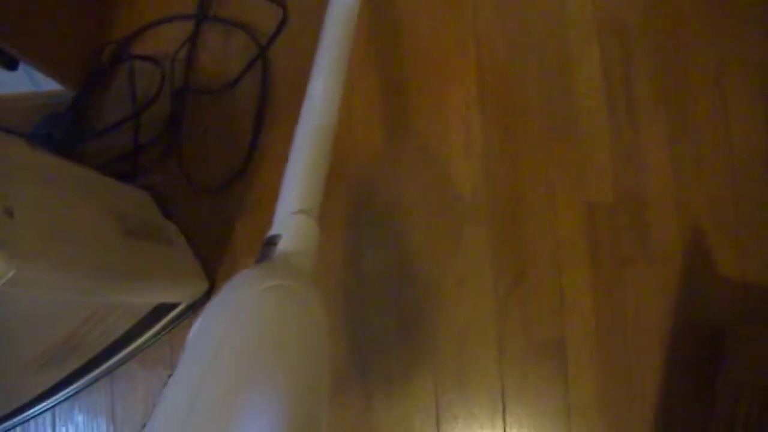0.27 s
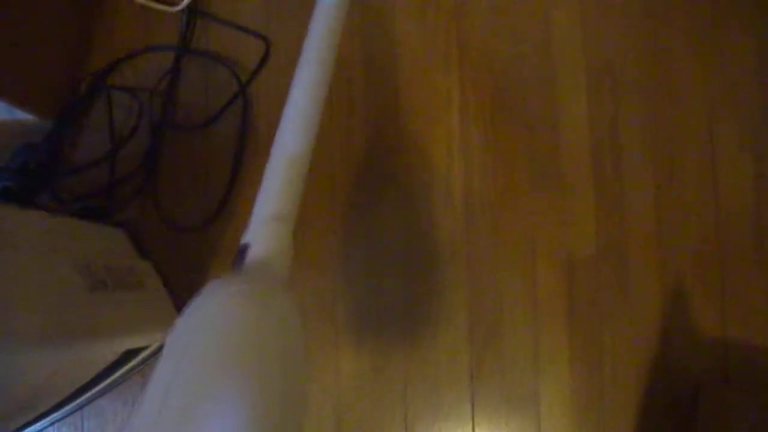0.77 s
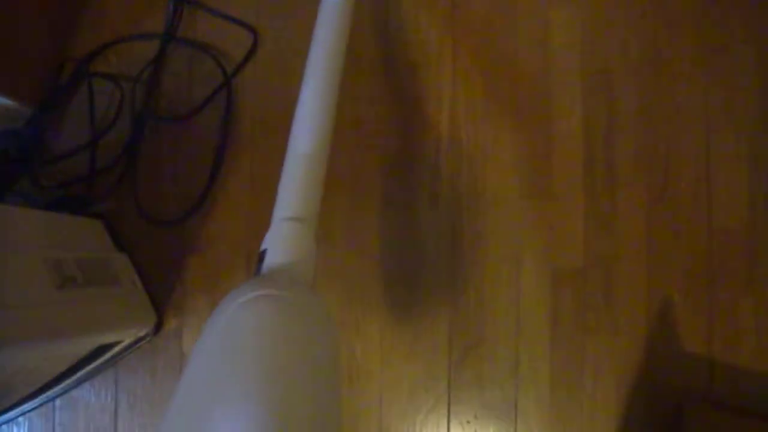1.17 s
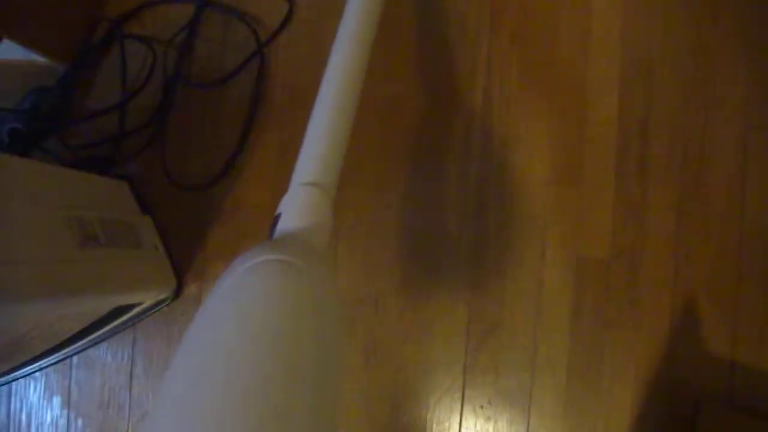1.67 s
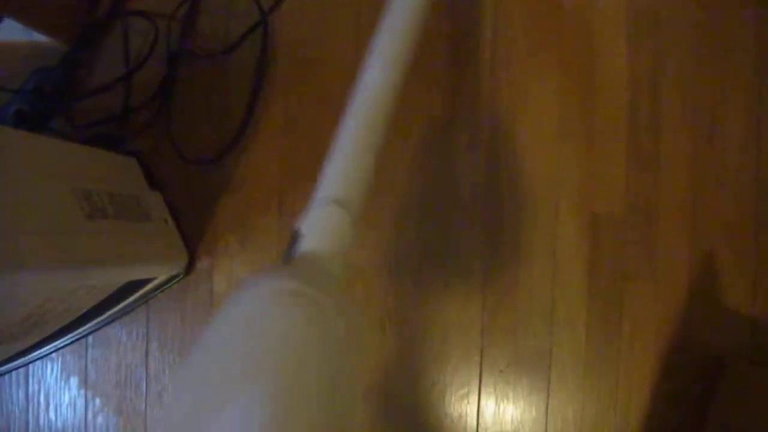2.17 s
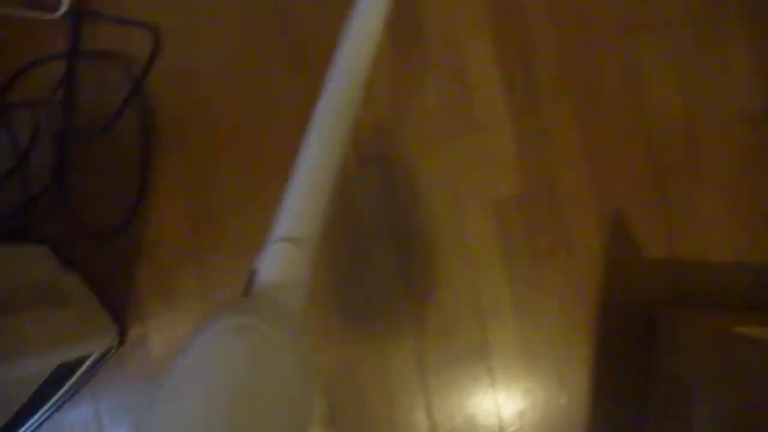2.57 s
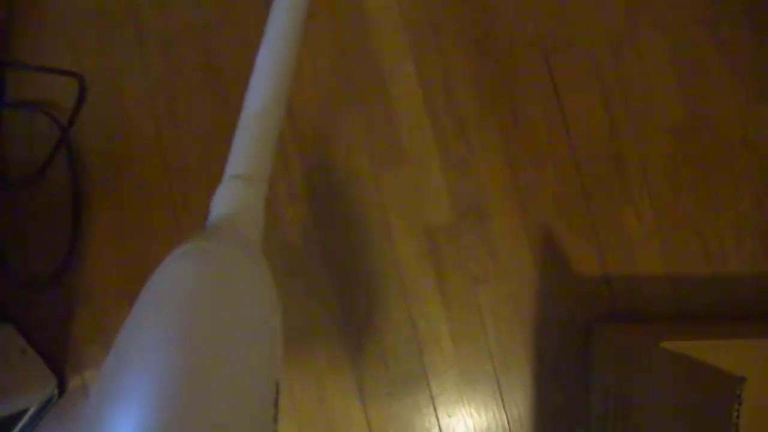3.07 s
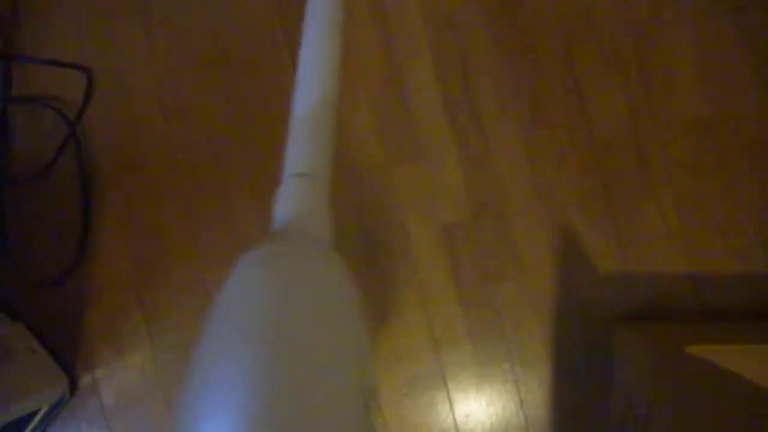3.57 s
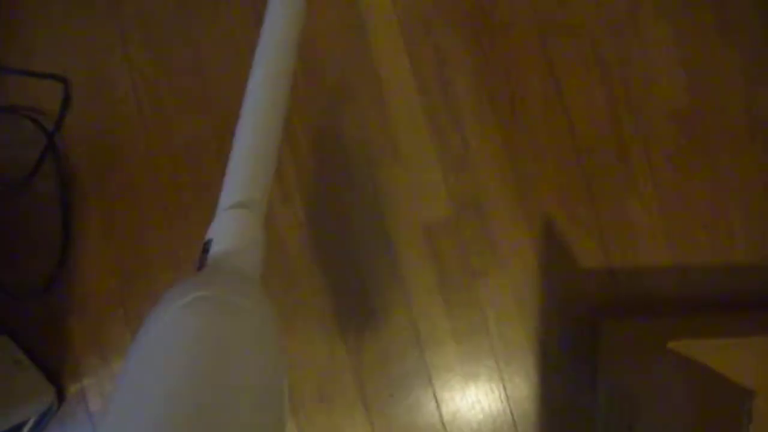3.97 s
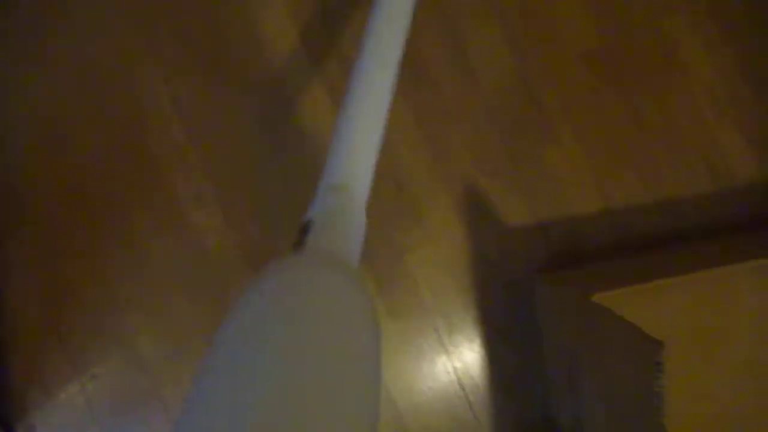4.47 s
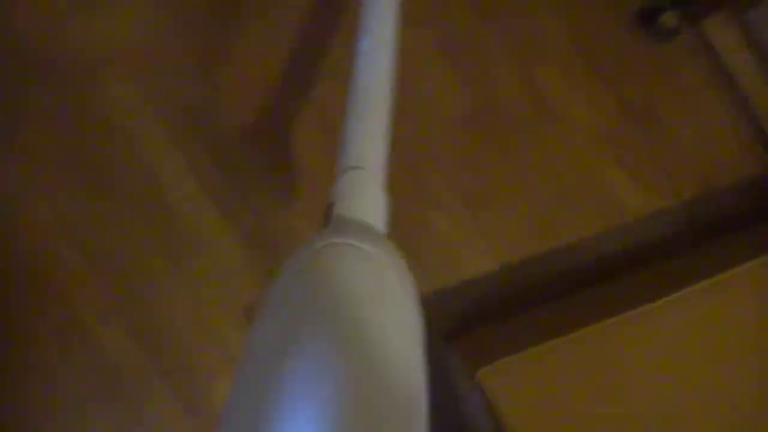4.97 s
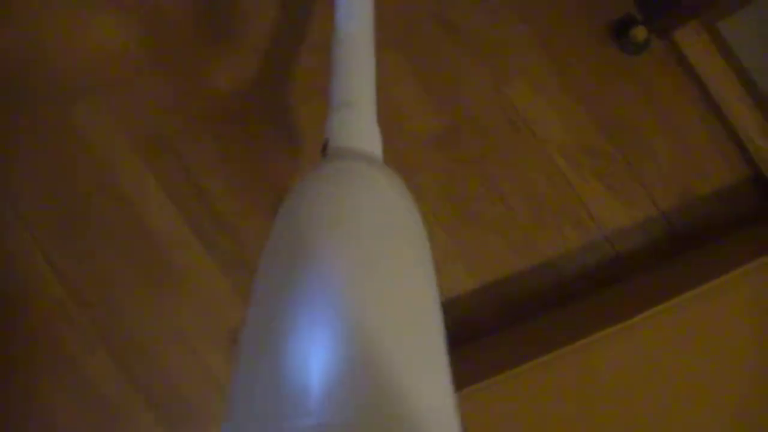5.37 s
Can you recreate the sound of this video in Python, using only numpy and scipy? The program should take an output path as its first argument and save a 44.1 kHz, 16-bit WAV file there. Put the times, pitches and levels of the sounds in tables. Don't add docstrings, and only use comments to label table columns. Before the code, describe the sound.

A cordless stick vacuum whines and rushes air in a quiet room, coasts down twice, and is twice switched back on amid plastic clicks.

```python
import sys
import numpy as np
from scipy import signal
from scipy.fft import rfft, irfft, next_fast_len
from scipy.io import wavfile
from scipy.ndimage import uniform_filter1d

SR = 44100
rng = np.random.default_rng(int(sys.argv[2]) if len(sys.argv) > 2 else 0)


def linear_from_db(decibels):
    return 10 ** (np.asarray(decibels, float) / 20)


def master_out(mix):
    frames = np.transpose(np.atleast_2d(mix))
    ceiling = np.clip(frames, -1, 1)
    pcm = np.round(ceiling * 32767).astype(np.int16)
    wavfile.write(sys.argv[1], SR, pcm)


N = 248283

BLADES, FULL_TURNS = 9, 281
# on [t/s], off [t/s], speed it strives for [turns/s], settling time [s]
POWER = [
    (0, .62, 279.9, .5),
    (.62, 1.486, 281.65, .15),
    (2.836, 3.629, 282.4, .1396),
    (4.836, 6, 279.4, .1396),
]


def rms_one(x):
    return x / np.sqrt(np.mean(x ** 2) + 1e-20)


def in_time(rows):
    s, *columns = np.transpose(rows)
    return [np.interp(np.arange(N) / SR, s, c) for c in columns]


def drift(rate):
    r = np.exp(-80 * np.pi * rate / SR)
    coarse = rng.standard_normal(N // 40 + 2002)
    slow = signal.lfilter([1], [1, -2 * r, r * r], coarse)[2000:]
    return np.interp(np.arange(N) / 40, np.arange(len(slow)), rms_one(slow))


def band(x, low_hz, high_hz, order=2):
    sos = signal.butter(order, [low_hz, min(high_hz, .45 * SR)], "band", fs=SR, output="sos")
    return signal.sosfilt(sos, x)


def narrow_noise(hz, width_hz):
    return rms_one(band(rng.standard_normal(N), hz - width_hz / 2, hz + width_hz / 2, order=1))


def coloured(spectrum, modes=()):
    size = next_fast_len(N)
    hz = np.arange(1, size // 2 + 2) * SR / size
    corner_hz, corner_db = np.transpose(spectrum)
    level_db = np.interp(np.log(hz), np.log(corner_hz), corner_db)
    for centre_hz, width_hz, lift_db in modes:
        level_db = level_db + lift_db / (1 + (2 * (hz - centre_hz) / width_hz) ** 2)
    return irfft(rfft(rng.standard_normal(size)) * linear_from_db(level_db), size)[:N]


def fades(rows):
    t = np.arange(N) / SR
    return sum(db * np.exp(-((t - s) / half) ** 2) for s, half, db in rows)


def spells(rows, rest_db, rise, t60):
    t = np.arange(N) / SR
    gain = linear_from_db(rest_db)
    for s, hold, db in rows:
        attack = np.clip(1 + (t - s) / rise, 0, 1) ** 2
        gain = gain + attack * linear_from_db(db - 60 * np.maximum(t - s - hold, 0) / t60)
    return gain


def rotor_turns():
    air_drag, friction = .0026, 37.1
    step_s = .001
    turns, out = 279.3, []
    for s in np.arange(0, N / SR + .002, step_s):
        pull = [(full - turns) / settle for on, off, full, settle in POWER if on <= s < off]
        turns += step_s * (pull[0] if pull else -air_drag * turns ** 2 - friction)
        out.append(turns)
    return np.interp(np.arange(N) / SR, np.arange(len(out)) * step_s, out)


def tone_levels(turns):
    # speed [turns/s], unbalance, blade tone, its 2nd, its 3rd [level/dB]
    tone_law = [(110, -85, -71, -74, -80), (140, -70, -61, -68, -66), (170, -64, -54, -64, -56),
                (200, -54, -54, -60, -55), (224, -52, -51, -56, -56), (234, -50, -37, -53, -55),
                (281, -42, -32.5, -39.5, -55)]
    # [f/Hz], width [Hz], lift [dB]
    housing_rings = [(5340, 200, 15), (4870, 200, 10), (4540, 160, 10)]
    # middle [t/s], half length [s], change [dB]
    unbalance_fades = [
        (.1, 0.085, -10),
        (1.3, 0.42, -6),
        (3.05, 0.11, -37),
        (3.5, 0.12, -8.5),
        (3.95, 0.1, 6),
        (5.05, 0.18, 7),
    ]
    blade_fades = [(0, 0.13, 5.5), (.52, 0.072, -5.5), (1.0, .11, -11), (3.165, 0.015, -8),
                   (3.25, 0.094, 6), (3.43, 0.1, -8.5), (3.72, 0.032, 5.5), (3.9, 0.15, -6),
                   (2.98, 0.027, -8), (5.12, 0.024, 3), (5.21, 0.022, -1)]
    second_fades = [
        (.3, .06, 7),
        (.7, .06, -5),
        (.9, .07, 6),
        (1.33, .1, -20),
        (1.56, .08, -9),
        (3.15, .2, -4),
        (5.03, .05, -8),
        (5.15, .05, 2),
        (5.33, .1, 3),
        (5.6, .12, 5),
    ]
    third_fades = [
        (4.09, .05, 5),
        (4.28, .12, 3),
    ]
    law_turns, *law_db = np.transpose(tone_law)
    unbalance, blade, second, third = [np.interp(turns, law_turns, column) for column in law_db]
    labour = (np.gradient(turns) > 0) * np.clip((229 - turns) / 8, 0, 1)
    hidden_db = -14 * uniform_filter1d(labour, size=400)
    off_speed = np.clip((FULL_TURNS - turns) / 5 - 1, 0, 1)
    beads_db = 4 * off_speed * np.cos(2 * np.pi * (BLADES * turns - 2400) / 88)
    rings_db = sum(db / (1 + (2 * (3 * BLADES * turns - hz) / width_hz) ** 2)
                   for hz, width_hz, db in housing_rings)
    return (unbalance + fades(unbalance_fades), blade + hidden_db + beads_db + fades(blade_fades),
            second + hidden_db + fades(second_fades), third + hidden_db + rings_db + fades(third_fades))


def air_levels(turns):
    # full-speed [level/dB], power of the speed, gain facing the exhaust [dB]
    air_law = [(-34.5, 2.47, -5), (-32, 2.48, -1.5), (-27.5, 3.26, 9), (-38, 2.76, 7.5)]
    # [t/s], exhaust facing the microphone [0-1], nearness [level/dB]
    pose = [(0, 0.01, 0.5), (.54, 0.08, -1.5), (1.1, 0.09, 0), (1.5, 0.03, 0.5), (2.2, 0.17, -0.5),
            (2.84, 0.4, 0), (2.87, 0.43, -1), (3.04, 0.66, 0.5), (3.33, 0.56, 1), (3.64, 0.72, 0),
            (3.78, 0.76, -1), (3.87, 0.07, 0.5), (4.2, 0.16, 0), (4.84, 0.5, 0.5), (4.92, 0.27, -2),
            (5.16, 0.14, 0.5), (5.4, 0.1, 1), (5.63, 0.15, 1)]
    surge_delay_s, surge_db, surge_s = .016, 4, .04
    facing, near_db = in_time(pose)
    facing = np.clip(facing, 0, 1)
    speed_db = 20 * np.log10(turns / FULL_TURNS)
    for on, *_ in POWER[2:]:
        since = np.arange(N) / SR - on - surge_delay_s
        near_db = near_db + surge_db * (since > 0) * np.exp(-np.maximum(since, 0) / surge_s)
    levels_db = [db + power * speed_db + facing * facing_db + near_db for db, power, facing_db in air_law]
    return levels_db + [facing]


def motor(turns):
    # multiple of the turns, level re the air layer around them [dB]
    side_orders = [(2, -22), (3, -25), (4, -19), (5, -23), (6, -22), (23, -20), (32, -27)]
    brush_db, brush_fall_db = -25, -2.2
    unbalance_db, blade_db, second_db, third_db = tone_levels(turns)
    roar_db, _, hiss_db, fizz_db, _ = air_levels(turns)
    angle = 2 * np.pi * np.cumsum(turns * (1 + .0005 * drift(8))) / SR
    tones = [(1, unbalance_db + 0.69 + 0.58 * drift(16)), (BLADES, blade_db + 0.31), (2 * BLADES, second_db)]
    tones.append((3 * BLADES, third_db - 3 + 1.5 * drift(10)))
    under_load_db = .2 * np.maximum(278 - turns, 0)
    for k, rel_db in side_orders:
        layer_db = roar_db if k < BLADES else hiss_db - under_load_db
        tones.append((round(k), layer_db + rel_db + 2.5 * drift(6)))
    for k in range(35, 59):
        above_khz = k * turns / 1000 - 10
        comb_db = brush_db + brush_fall_db * np.clip(above_khz, -2, 4) + 0.7 * drift(1.5)
        tones.append((k, fizz_db + comb_db - 99 * (above_khz > 6)))
    waver_db = [1.73 * drift(19) for _ in range(5)]
    return sum(np.sqrt(2) * linear_from_db(db + waver_db[k % 5]) * np.sin(k * angle + k * k) for k, db in tones)


def air(turns, patchy_db, flutter_db):
    layer_edges_hz = [1300, 3500, 7700]
    # [f/Hz], [level/dB per Hz]
    rush_spectrum = [(35, -78), (60, -60), (156, -33.5), (279, -5), (404, -8.5), (499, -6), (813, -2.5),
                     (1330, -6), (1450, -2.5), (2020, -6), (2480, -1.5), (2790, -8), (4880, -8), (6300, -6),
                     (15600, -38.5)]
    jet_spectrum = [(35, -69), (60, -27.5), (149, -29), (272, -6), (336, -22), (444, -11), (852, -23),
                    (979, -11), (1070, -10), (1290, -13.5), (2320, -6.5), (2480, -13), (2860, -9),
                    (5880, -8.5), (15600, -19.5)]
    # [f/Hz], width [Hz], lift [dB]
    tube_modes = [(225.4, 61, 9), (500, 120, 6.5), (560, 6.8, 4.5), (716, 17, 0.5), (797.6, 32, 7),
                  (1034, 25, 5.5), (1110, 16, 8), (1243, 6, 10.5), (1477, 59, 5), (1918, 46, 5.5),
                  (2140, 77, 4.5)]
    # [f/Hz], width [Hz], lift [dB]
    rush_humps = [(5530, 170, 2), (11200, 1050, -12.5), (14600, 2300, 1.5)]
    jet_humps = [(3480, 350, -7.5), (6030, 680, 10.5), (7050, 190, 6), (14400, 1600, -13)]
    *levels_db, facing = air_levels(turns)
    flows = [[coloured(rush_spectrum, tube_modes + rush_humps), coloured(jet_spectrum, tube_modes + jet_humps)]
             for _ in range(2)]
    edges = 25 * 2 ** np.arange(0, 9.5, 1 / 3)
    layers, gust = np.zeros((4, 2, N)), drift(4.4)
    for k, (low_hz, high_hz) in enumerate(zip(edges, edges[1:])):
        swell = linear_from_db(patchy_db * drift(0.43) + flutter_db * gust)
        layer = np.searchsorted(layer_edges_hz, np.sqrt(low_hz * high_hz))
        layers[layer] += swell * band(flows[k % 2], low_hz, high_hz)
    return sum(linear_from_db(db) * (np.sqrt(1 - facing) * rms_one(away) + np.sqrt(facing) * rms_one(toward))
               for db, (away, toward) in zip(levels_db, layers))


def singing_tube():
    singing_hz = [549, 798]
    singing_width_hz = [15, 27]
    # start [t/s], hold [s], [level/dB]
    lower_sings = [
        (0.553, 0.19, -38),
        (2.04, 0.35, -49),
        (3.103, 0.077, -36.5),
        (3.653, 0.042, -29),
        (3.96, 0.44, -36),
        (4.99, .7, -34),
    ]
    upper_sings = [
        (.08, 0.085, -41),
        (.68, .06, -35),
        (1.299, 0.23, -30.5),
        (2.04, .56, -50),
        (3.08, .04, -36),
        (3.5, 0.19, -35.5),
        (4.5, 0.14, -43.5),
        (4.98, .4, -34.5),
        (5.4, .3, -27),
    ]
    notes = zip([lower_sings, upper_sings], singing_hz, singing_width_hz)
    return sum(spells(rows, -48.5, rise=0.071, t60=0.41) * linear_from_db(-9.5) * narrow_noise(hz, width_hz)
               for rows, hz, width_hz in notes)


def rumble():
    # start [t/s], hold [s], [level/dB]
    jolts = [
        (.54, .02, -64),
        (2.24, .03, -58),
        (2.45, 0.079, -61),
        (2.78, .02, -66),
        (2.87, 0.064, -53.5),
        (4.02, 0.38, -53.5),
        (4.46, 0.018, -45),
        (4.63, 0.24, -53),
    ]
    gain = spells(jolts, -72.5, rise=0.014, t60=0.2) * linear_from_db(1.54 * drift(10.5))
    return gain * rms_one(band(rng.standard_normal(N), 102.4, 199, order=3))


def room_tone():
    # [f/Hz], [level/dB per Hz]
    idle_spectrum = [(18, -48), (30, 15), (127, -32.5), (422, 17), (481, 16), (676, -48), (901, -7.5),
                     (1170, -42), (2500, -18), (2930, -52), (3160, -7), (4220, -18), (6590, 26),
                     (7910, -48.5), (15600, 14)]
    # [f/Hz], width [Hz], lift [dB]
    idle_humps = [(4020, 60, 7), (6500, 400, -1), (11200, 2500, 17), (15400, 1300, -30)]
    return linear_from_db(-47.5) * rms_one(coloured(idle_spectrum, idle_humps))


def whistles():
    whistle_rows = [
        (.33, .05, -43, 1580, 40),
        (.4, .08, -39, 1600, 500),
        (1.9, .2, -53, 3240, 25),
        (4.18, .18, -53, 4005, 25),
        (4.857, .006, -40, 5250, 200),
        (2.3, .2, -58, 4020, 30),
        (2.77, .07, -63, 11900, 150),
    ]
    return sum(spells([(s, hold, db)], -120, rise=.01, t60=0.18) * narrow_noise(hz, width_hz)
               for s, hold, db, hz, width_hz in whistle_rows)


def burst(out_len, t60, rattle):
    t = np.arange(out_len) / SR
    uneven = linear_from_db(2.5 * np.repeat(rng.standard_normal(out_len // 60 + 1), 60)[:out_len])
    decay = linear_from_db(-60 * np.maximum(t - rattle, 0) / max(t60, .005))
    attack = 1 + 1.07 * np.exp(-t / 0.0025)
    return decay * attack * uneven * rng.standard_normal(out_len)


def strikes(rows, spread, order):
    out = np.zeros(N + 8000)
    for s, db, hz, t60, *rattle in rows:
        hit = band(burst(8000, t60, max(sum(rattle), 0)), hz / spread, hz * spread, order=order)
        out[round(s * SR):][:8000] += linear_from_db(db) * hit / np.max(np.abs(hit[:1500]))
    return out[:N]


def clicks():
    # [t/s], peak [level/dB], centre [f/Hz]
    snaps = [
        (2.1006, -37, 9200),
        (2.7621, -32.5, 8800),
        (2.5506, -41, 12000),
        (2.7614, -46, 12800),
        (2.8534, -45, 12800),
        (2.8744, -36, 12800),
        (4.3909, -42, 12800),
        (4.5531, -35, 12800),
        (4.8529, -40, 12800),
    ]
    ticks = [(2.154, -17, 5470), (2.1627, -19, 6200), (2.2305, -23.5, 5570), (2.2672, -26, 6570),
             (2.3064, -28, 6340), (2.3544, -31, 6130), (2.4418, -28, 5900), (2.4668, -29.5, 6460),
             (2.544, -25, 5950), (2.8544, -22, 5900), (4.1754, -23.5, 6430), (4.3929, -24.5, 5930),
             (4.6039, -27, 5000), (4.8513, -24, 6440)]
    rattles = [
        (2.8694, -9.5, 6000),
        (3.926, -22, 6250),
        (4.0736, -26, 5400),
        (4.1684, -27, 6010),
        (4.4348, -24, 5840),
        (4.6234, -30, 6500),
        (4.7027, -29.5, 5600),
        (4.866, -30, 6000),
    ]
    kinds = [(ticks, 0.053, 0.0046), (rattles, 0.053, 0.01), (snaps, 0.049, 0.0046)]
    rows = [(*row, t60, rattle) for kind, t60, rattle in kinds for row in kind]
    return strikes(rows, spread=1.24, order=2)


def bumps():
    # [t/s], peak [level/dB], centre [f/Hz], t60 [s]
    bump_rows = [(2.227, -30.5, 549, 0.16), (2.459, -47, 450, 0.08), (2.549, -35.5, 410, 0.072),
                 (4.161, -22, 424, 0.25), (4.435, -31.5, 264, 0.15), (4.612, -31, 331, 0.3),
                 (4.698, -32, 260, 0.24), (4.827, -31, 339, 0.13), (4.839, -42, 412, 0.08),
                 (2.866, -22.5, 500, 0.18), (2.874, -22, 500, 0.21), (2.8534, -40, 2100, 0.068),
                 (2.8664, -24, 2100, 0.078), (2.8744, -12.5, 2020, 0.064), (4.8512, -26.5, 2500, 0.11)]
    return strikes(bump_rows, spread=1.37, order=1)


def room(x):
    t = np.arange(round(.5 * SR)) / SR
    tail = rng.standard_normal(len(t)) * linear_from_db(-60 * t / 0.22) * (t > .006)
    tail = signal.sosfilt(signal.butter(1, 7000, fs=SR, output="sos"), tail)
    return signal.fftconvolve(x, tail / np.sqrt(np.sum(tail ** 2)))[:N]


def scene():
    turns = rotor_turns()
    tones = motor(turns)
    knocks = clicks() + bumps()
    knocks = band(knocks + linear_from_db(-10) * room(knocks), 180, 14800)
    gliding = np.clip(uniform_filter1d(np.abs(np.gradient(turns)), size=2000) * SR / 90, 0, 1)
    steady_echo_db, gliding_echo_db = -17, -10
    echo_db = steady_echo_db + gliding * (gliding_echo_db - steady_echo_db)
    mono = tones + linear_from_db(echo_db) * room(band(tones, 490, 10000, order=1))
    mono = mono + air(turns, patchy_db=1.11, flutter_db=0.55) + singing_tube()
    mono = mono + rumble() + room_tone() + whistles() + knocks
    return np.array([mono, mono])


def side_flecks(mono, fleck_db):
    # [t/s], from [f/Hz], to [f/Hz]
    fleck_rows = [(.78, 11000, 12500), (.78, 13800, 15300), (.87, 9600, 11100), (.87, 13100, 14500),
                  (.96, 5100, 6400), (1.33, 6900, 8400), (1.33, 8900, 10400), (1.43, 5600, 8400),
                  (1.43, 9600, 11100), (1.45, 9600, 13200), (1.5, 10300, 11800), (3.4, 9600, 11100),
                  (3.58, 14500, 15700), (3.63, 14500, 15700), (3.86, 14500, 15700), (4.05, 13800, 15300),
                  (4.35, 6900, 9000), (4.77, 14500, 15700)]
    side, hz = np.zeros(N), np.arange(1025) * SR / 2048
    window = np.minimum(3 * np.sin(np.pi * np.arange(2048) / 2048) ** 4, 1)
    for s, low_hz, high_hz in fleck_rows:
        at = slice(round(s * SR) - 1024, round(s * SR) + 1024)
        inside = (hz > low_hz) & (hz < high_hz)
        level = np.std(irfft(rfft(mono[at]) * inside))
        noise = rms_one(irfft(rfft(rng.standard_normal(2048)) * inside))
        side[at] += linear_from_db(fleck_db) * level * window * noise
    return side


def top_cut(x):
    return signal.sosfilt(signal.butter(12, 15770, fs=SR, output="sos"), x)


def record(dry):
    notch_hz, notch_width_hz, notch_leak = 7740, 300, .08
    notched = signal.lfilter(*signal.iirnotch(notch_hz, notch_hz / notch_width_hz, fs=SR), dry[0])
    mono = notched + notch_leak * (dry[0] - notched)
    mono = .45 * np.tanh(mono / .45)
    side = side_flecks(mono, fleck_db=-4.0)
    return top_cut(np.array([mono + side, mono - side]))


dry = scene()
out = record(dry)
master_out(out)
```